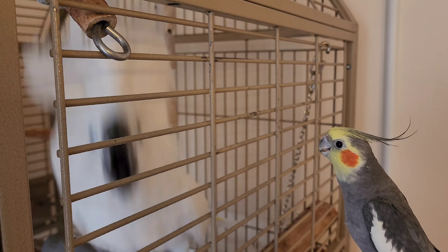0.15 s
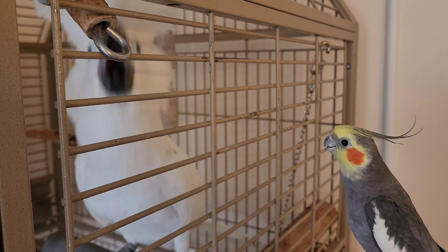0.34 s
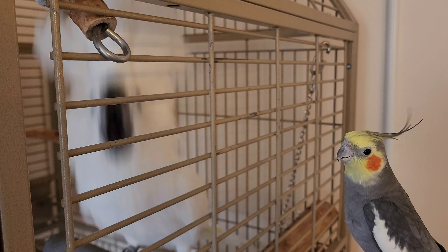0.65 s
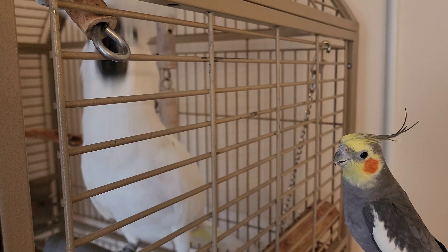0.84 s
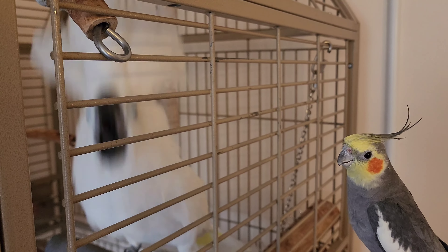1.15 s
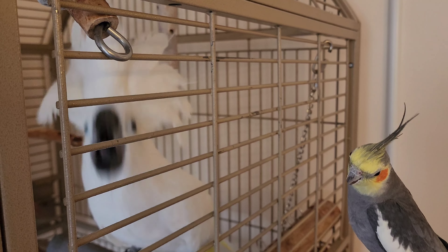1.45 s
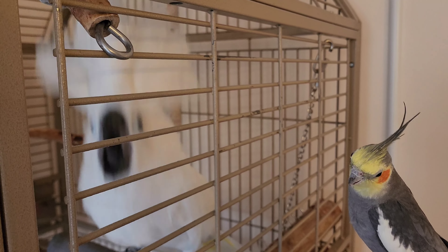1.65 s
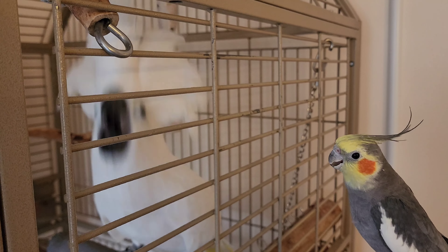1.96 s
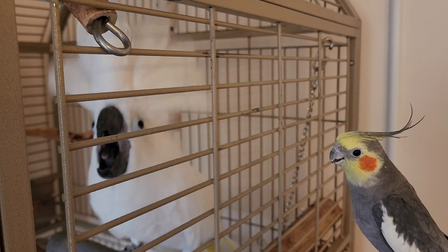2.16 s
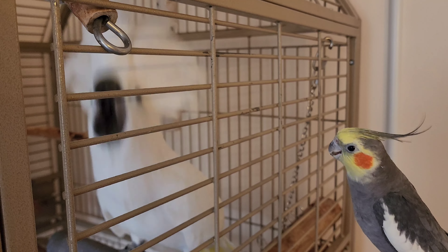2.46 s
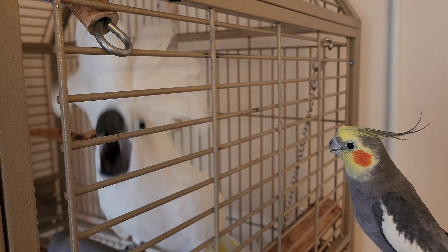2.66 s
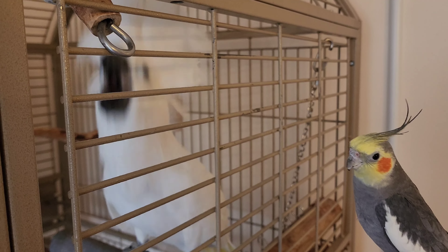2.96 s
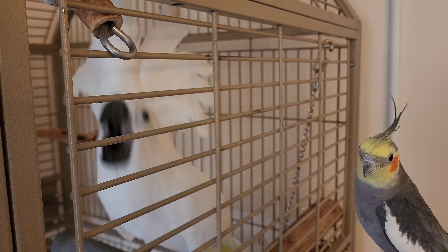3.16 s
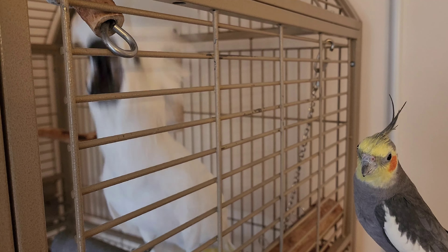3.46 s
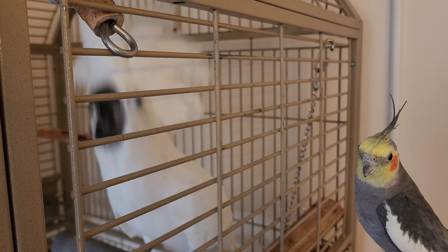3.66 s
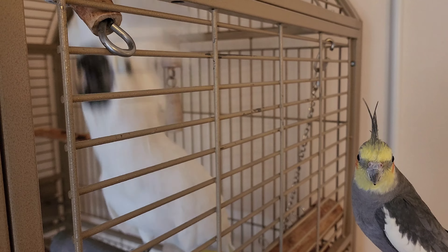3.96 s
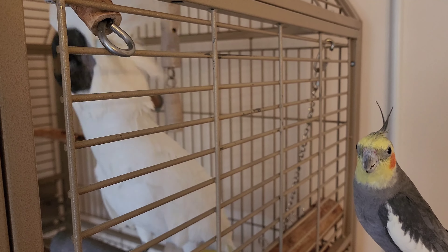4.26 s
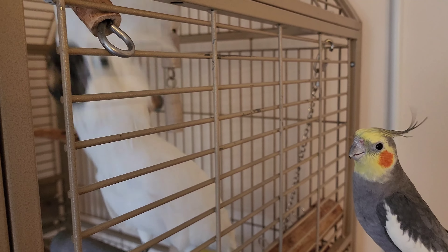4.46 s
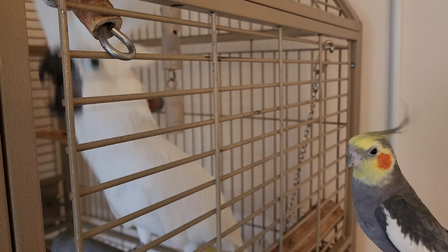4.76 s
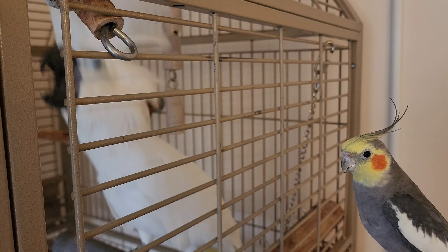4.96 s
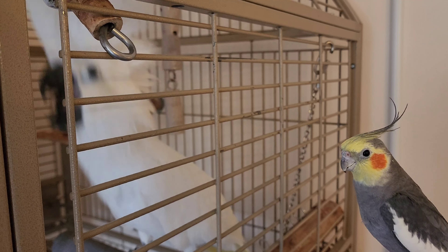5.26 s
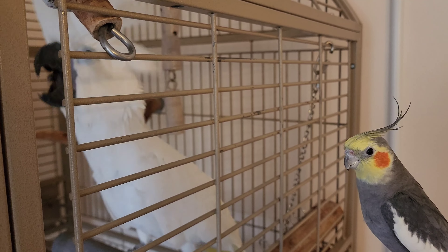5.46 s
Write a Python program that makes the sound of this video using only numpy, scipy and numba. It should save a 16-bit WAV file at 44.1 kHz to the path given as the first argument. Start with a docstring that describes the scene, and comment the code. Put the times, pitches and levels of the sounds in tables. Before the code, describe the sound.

A cockatoo in a cage calls briefly: a wheeze and rising whistle ending in a rasp at the start, then a broken call of thin whistles and two rasps near two seconds, and a final wheeze, whistle and stuttering squawk after four. Claws and beak tick on ringing bars; feathers rustle faintly. Quiet small room, low hum, close stereo microphone, bird slightly right.

```python
"""In a quiet room a caged cockatoo calls softly, a little to the right of a two-port microphone.
Each call opens with a wheeze (windpipe turbulence) or a clear whistle (gliding partials) and breaks
into a rasp (uneven pulses and puffs of air through windpipe, mouth and beak).
Claws and beak tick on the ringing cage bars, the perch thumps softly and feathers rustle;
coloured noise with wavering hum bands and a faint hiss fills the room."""
import sys
import numpy as np
from scipy import signal
from scipy.fft import rfft, irfft, next_fast_len
from scipy.io import wavfile
from scipy.ndimage import uniform_filter1d
from numba import njit

SR = 44100
rng = np.random.default_rng(int(sys.argv[2]) if len(sys.argv) > 2 else 0)


def digitize_waveform(pressure):
    """Quantize a signal to 16-bit integers and store it at the path in sys.argv[1].

    Rows of a 2-D input are taken as channels; values are limited to [-1, 1].
    """
    field = np.atleast_2d(pressure).T
    bounded = np.clip(field, -1, 1)
    quanta = np.round(bounded * 32767).astype(np.int16)
    wavfile.write(sys.argv[1], SR, quanta)


def volts(x):
    """Linear amplitude factor 10**(x/20) for a level x in dB, scalar or array-like."""
    e = np.asarray(x, float) / 20
    return 10 ** e


N = 247401
TIME = np.arange(N) / SR
SIDES = np.array([[1], [-1]])   # left, right

# one list a rasp, of the pulsed voice shaped by the mouth:
# start_s, mouth_level_db, mouth_resonance_hz, upper_resonance_db (against the mouth)
RASP_PATHS = [
    [(0.19, -45.5, 2236, -7), (0.202, -27, 2303, -8), (0.248, -25.5, 3173, -4), (0.273, -18.5, 3198, -4.5),
     (0.317, -27.5, 3532, -3), (0.335, -41.5, 3104, 6)],
    [(1.962, -46, 3010, -9), (1.984, -24, 2980, -9), (1.99, -18, 3047, -29), (2.02, -29.5, 3020, -8.5),
     (2.03, -18, 3133, -27), (2.04, -26.5, 3156, -16.5), (2.085, -25, 3290, -16.5),
     (2.095, -23, 3305, -29.5), (2.122, -18.5, 3286, -17), (2.13, -14.5, 3176, -14),
     (2.15, -15.5, 3190, -30), (2.16, -28.5, 3054, -31.5)],
    [(2.478, -39.5, 2890, -9), (2.49, -26, 2873, -10), (2.508, -19, 2831, -9.5), (2.524, -19, 3200, -5.5),
     (2.56, -42, 3098, -0.5)],
    [(4.358, -32, 2740, -14.5), (4.364, -23.5, 2647, -10), (4.403, -23, 2746, -4.5),
     (4.408, -20.5, 3117, -5), (4.435, -15, 3313, -7), (4.459, -28.5, 3130, 7.5), (4.49, -30, 3450, 1)],
]
# resonances that air noise excites in the beak: centre_hz, width_hz, level_db
BEAK_MODES = [(5840, 890, -5), (7000, 760, 0)]


def rms_one(x):
    """Scale to rms 1."""
    return x / np.sqrt(np.mean(x ** 2) + 1e-20)


def noise():
    """White noise as long as the scene."""
    return rng.standard_normal(N)


def at_hz(points, hz):
    """Read a spectrum on a log-frequency axis."""
    point_hz, value = np.array(points).T
    return np.interp(np.log(hz + 1), np.log(point_hz), value)


def in_time(rows):
    """Columns of a table, one value a sample; corners are rounded over 3 ms."""
    s, *columns = np.transpose(rows)
    return [uniform_filter1d(np.interp(TIME, s, c), size=130) for c in columns]


def sounding(tables, edge_s):
    """1 inside any of the tables, 0 outside, with soft edges."""
    inside = sum((TIME >= rows[0][0]) & (TIME <= rows[-1][0]) for rows in tables) > 0
    return uniform_filter1d(inside * 1., max(int(edge_s * SR), 1))


def since_start(tables):
    """Which table began last, and how many seconds ago."""
    starts = np.array([rows[0][0] for rows in tables])
    which = np.maximum(np.searchsorted(starts, TIME) - 1, 0)
    return which, np.maximum(TIME - starts[which], 0)


def drift(rate_hz):
    """Random wander of rms 1: noise through two one-pole lowpasses at rate_hz."""
    r = np.exp(-2 * np.pi * rate_hz / SR)
    wander = signal.lfilter([1], [1, -2 * r, r * r], rng.standard_normal(N + SR))
    return rms_one(wander[SR:])


def cut(x, hz, kind):
    """A steep filter edge."""
    return signal.sosfilt(signal.butter(6, hz, kind, fs=SR, output="sos"), x)


def resonate(x, modes):
    """Parallel resonances of (centre_hz, width_hz, level_db), signs alternating."""
    out = 0
    for k, (hz, width_hz, db) in enumerate(modes):
        r = np.exp(-np.pi * width_hz / SR)
        a = [1, -2 * r * np.cos(2 * np.pi * hz / SR), r * r]
        b = [(1 - r * r) / 2, 0, (r * r - 1) / 2]
        out = out + (-1) ** k * volts(db) * signal.lfilter(b, a, x + 1e-18)
    return out


@njit
def glide(x, cosine, r):
    """A two-pole resonance whose centre moves."""
    y = np.zeros(len(x))
    for i in range(2, len(x)):
        y[i] = x[i] - x[i - 2] + 2 * r * cosine[i] * y[i - 1] - r * r * y[i - 2]
    return y


def moving_resonance(x, centre_hz, width_hz):
    """A resonance that follows a centre curve at a constant width."""
    return glide(x, np.cos(2 * np.pi * centre_hz / SR), np.exp(-np.pi * width_hz / SR))


def evened(x, span_s):
    """Divide by the running rms, so that a level curve can be laid on."""
    return x / np.sqrt(uniform_filter1d(x ** 2, int(span_s * SR)) + 1e-20)


def hum():
    """A few narrow noise bands waver like hum."""
    # hum bands: centre_hz, width_hz, level_db
    bands = [(50, 19, -68.5), (142.1, 20, -63.5), (220.1, 18, -63.5), (299, 27, -71.5), (437, 65, -69)]
    total = 0
    for hz, width_hz, db in bands:
        once = resonate(noise(), [(hz, width_hz, 0)])
        total = total + volts(db) * rms_one(resonate(once, [(hz, width_hz, 0)]))
    left_over_right_db = 3.5
    return total * volts(left_over_right_db / 2 * SIDES)


def room_tone():
    """Coloured noise, largely shared by both sides except in the treble, and the hum."""
    # colour of the noise: pitch_hz, density_db (relative)
    colour = [(12, -38), (20, -2), (93, -9.5), (232, -0.5), (333, -7.5), (440, -4.5), (598, -13),
              (790, -12), (1630, -21), (1980, -18), (3360, -29.5), (7340, -32), (9970, -39), (13200, -30.5),
              (15600, -42.5)]
    # how alike left and right are: pitch_hz, likeness (1 = the same, 0 = unrelated)
    likeness = [(60, 1), (180, 0.94), (550, 0.59), (1650, 0.82), (4970, -0.08), (15000, -0.02)]
    # side balance of the noise: pitch_hz, left_over_right_db
    balance = [(60, -2), (180, 1.5), (550, 3), (1650, -3), (4970, -3.5), (15000, -2.5)]
    # level of the noise above 3 kHz: time_s, level_db
    treble_level = [(0, -59), (1.2, -64.5), (2, -63.5), (3.8, -68.5), (5.61, -67)]
    rumble_db = -56   # below 3 kHz
    left_lead_s = .00018   # the coloured noise reaches the left port first

    hz = np.fft.rfftfreq(N, 1 / SR)
    alike = np.clip(at_hz(likeness, hz), 0, 1)
    spectra = rfft(rng.standard_normal((2, N)))
    mid, side = spectra * volts(at_hz(colour, np.minimum(hz, 14200)))
    pair = np.sqrt(1 + alike) * mid + np.sqrt(1 - alike) * side * SIDES
    pair = pair * volts(at_hz(balance, hz) / 2 * SIDES)
    pair = pair * np.exp(1j * np.pi * hz * left_lead_s * SIDES)
    low, high = irfft(pair * (hz < 3000), N), irfft(pair * (hz >= 3000), N)
    hiss_db, = in_time(treble_level)
    hiss = volts(hiss_db + drift(5)) * rms_one(high)
    return volts(rumble_db) * rms_one(low) + hum() + hiss


def rustle():
    """Feathers shift: resonant noise in faint bright swells, several a second."""
    # middle of the swells: time_s, level_db
    rustle_level = [(0, -65.5), (1.6, -71), (2.8, -70.5), (3.4, -75.5), (5.61, -84)]
    spread_db, wander_hz = 5, 6
    db, = in_time(rustle_level)
    swell = volts(db + spread_db * drift(wander_hz))
    modes = [(1973, 1400, 3), (4300, 2000, -3.5), (6800, 490, 2.0), (12520, 2600, -11.5)]
    return swell * rms_one(resonate(rng.standard_normal((2, N)), modes))


def thumps():
    """The perch takes a step: soft low blows, each a sine that swells and dies within tens of ms."""
    # steps: start_s, push_db (before the envelope)
    steps = [(0.88, -34.5), (1.542, -41.5)]
    thump_hz = 72.4
    out = np.zeros(N)
    for s, db in steps:
        age = np.maximum(TIME - s, 0)
        envelope = age / 0.011 * np.exp(-age / 0.0085)
        out += volts(db) * envelope * np.sin(2 * np.pi * thump_hz * age)
    return out


def ticks():
    """Each touch of claw or beak is a short bright noise scuff whose knock sets the bars ringing."""
    # touches on the bars: start_s, scuff_db, knock_db (against the scuff)
    touches = [(0.0458, -40, -8.5), (0.5635, -51, 6), (0.6894, -62, 12.5), (0.7842, -58, 13.5),
               (0.9248, -50, 9.5), (1.0218, -60.5, 17), (1.1096, -55.5, 12.5), (1.2796, -63.5, 17.5),
               (1.5333, -54.5, 6), (1.7532, -57.5, 16), (1.795, -51.5, 2), (2.7453, -60.5, 18),
               (2.9189, -68, 11.5), (3.1348, -62.5, 3), (3.1961, -55, 18.5), (3.2021, -48.5, -7),
               (3.2148, -48.5, 11.5), (3.445, -63.5, 15), (3.5054, -61, 13.5), (3.8086, -69.5, 22.5),
               (4.62, -65.5, 5), (4.864, -58, -1), (5.2021, -59, -7)]
    # what the bars ring with: pitch_hz, level_db, t60_s
    bars = [(1243.5, 14, 0.13), (2397, -4.5, 0.14), (2710, -1, .1), (4650, 5.5, 0.18), (4530, -1, .2),
            (5010, -16, .12), (5670, 1, 0.15), (6330, 5.5, 0.099), (8230, -3.5, 0.25), (11370, -2.4, 0.092)]
    rise_s, fall_s = 0.0027, 0.016
    scuff, knock = np.zeros(N), np.zeros(N)
    for s, db, knock_db in touches:
        age = np.maximum(TIME - s, 0)
        shape = volts(db) * np.minimum(age / rise_s, 1) * np.exp(-age / fall_s)
        scuff += shape
        knock += volts(knock_db) * shape
    bright = [(4310, 1000, 1), (6620, 850, -1), (12310, 3200, -1)]
    scuff = scuff * rms_one(resonate(noise(), bright))
    # a mode that decays 60 dB in t60 has this width
    bar_modes = [(hz, np.log(1000) / np.pi / t60, db) for hz, db, t60 in bars]
    ring = resonate(noise() * knock, bar_modes)
    dull_knock = resonate(noise() * knock, [(2062, 1300, -3)])
    return scuff + ring + dull_knock


def room(x):
    """Eight feedback delays a side, duller on every round, then three near-allpass diffusers."""
    t60_s, wall_cut_hz = 0.31, 7500   # t60 of the bass
    size = next_fast_len(N + SR)
    turn = -2j * np.pi * np.fft.rfftfreq(size)   # exponent of a one-sample delay
    dull = np.exp(-2 * np.pi * wall_cut_hz / SR)
    wall = (1 - dull) / (1 - dull * np.exp(turn))
    response = np.zeros((2, len(turn)), complex)
    for k, lag in enumerate(rng.uniform(.008, 0.036, 16) * SR):
        loop = volts(-60 * lag / SR / t60_s) * wall * np.exp(turn * int(lag))
        response[k % 2] += (-1) ** (k // 2) * loop / (1 - loop)
    for lag in rng.uniform(.001, .006, 3) * SR:   # furniture scatters each echo
        delay = np.exp(turn * int(lag))
        response *= (delay - .6) / (1 - 0.49 * delay)
    return irfft(rfft(x, size) * response, size)[:, :N]


def to_ports(x):
    """Each microphone port hears the bird with its own level, phase and first echo."""
    # side balance of the bird: pitch_hz, left_over_right_db
    balance = [(60, 0.0), (110, 0.5), (200, 3), (380, -0.5), (700, 1.5), (1290, -5), (2380, -11.5),
               (4400, -2.5), (8120, 2), (15000, 0.5)]
    # phase between the ports: pitch_hz, left_lead_rad
    phase = [(400, -0.22), (1500, -0.42), (3200, 0.9), (5200, 0.8), (7000, -2.4), (9000, -1), (13000, -2.7),
             (15000, -1)]
    # first echo, left port then right: delay_s, level_db (approached towards the treble)
    near_wall = [(.0017, -15), (.0026, -1.5)]
    # a dip in what the ports pick up from that side
    shadow_hz, shadow_width_hz, shadow_share = 8600, 1200, 0.49

    hz = np.fft.rfftfreq(N, 1 / SR)
    left = volts(at_hz(balance, hz) / 2) * np.exp(.5j * at_hz(phase, hz))
    scale = 2 / np.abs(left + 1 / left)   # the sum of both direct paths keeps its level
    scale = scale * (1 - shadow_share * np.exp(-((hz - shadow_hz) / shadow_width_hz) ** 2))
    brighter = hz / (hz + 4000)
    echo = [volts(db) * brighter * np.exp(-2j * np.pi * hz * s) for s, db in near_wall]
    return irfft(rfft(x) * scale * (np.array([left, 1 / left]) + echo), N)


def wheezes():
    """Air drawn in before a call: fluttering windpipe turbulence with a thin hiss past the beak."""
    # one list a wheeze: start_s, windpipe_level_db, hiss_db (against it), narrow_resonance_hz
    breaths = [
        [(0.0, -42.5, -24.5, 1700), (0.034, -41.5, -27, 1920), (0.05, -35.5, -14.5, 2000),
         (0.082, -40.5, -8.5, 1770), (0.12, -44.5, -10, 1820)],
        [(4.12, -56.5, -12, 1500), (4.186, -44, -17, 1600), (4.242, -36.5, -28, 1540), (4.282, -46, -32, 1500),
         (4.31, -46.5, -35.5, 1500)],
    ]
    # fixed resonances of the windpipe: centre_hz, width_hz, level_db
    tube_modes = [(907.5, 1500, -18.5), (1635, 180, 12), (2600, 610, -15.5), (3460, 1200, -18)]
    narrow_width_hz, narrow_db = 380, -4.5
    db, hiss_db, narrow_hz = in_time(np.concatenate(breaths))
    air = noise() * volts(2.4 * drift(200))   # a loose flutter chops the air
    tube = rms_one(cut(resonate(air, tube_modes), [600, 4700], "band"))
    narrow = rms_one(moving_resonance(air, narrow_hz, narrow_width_hz))
    tube = rms_one(tube + volts(narrow_db) * narrow)
    hiss = rms_one(cut(resonate(air, BEAK_MODES + [(12600, 3000, 0)]), 5100, "high"))
    return volts(db) * (tube + volts(hiss_db) * hiss) * sounding(breaths, 0.037)


def rasp_colour(db):
    """Windpipe, beak and top hiss against the mouth: own to each rasp, falling back as it swells."""
    # one row a rasp, at the usual level: windpipe_db, beak_db, top_hiss_db
    colours = [(-1.5, -21.5, -18), (-12.5, -29.5, -28.5), (-9.5, -24.5, -20.5), (-4.5, -20, -17)]
    # dB gained per dB of swell: windpipe, beak, top hiss
    swell_shares = np.array((.4, .7, .65))
    usual_db = -25
    pipe_fade_db_per_s = 62.5   # the windpipe closes off as a rasp goes on
    which, age = since_start(RASP_PATHS)
    own = np.array(colours)[which].T
    pipe, beak, top = own + (swell_shares[:, None] - 1) * (db - usual_db)
    return pipe - pipe_fade_db_per_s * age, beak, top


def rasp_flow(db):
    """Level curve of the rasps, dipping briefly where the air stream catches."""
    # catches: start_s, length_s, depth_db (before smoothing)
    catches = [(.267, .006, -20), (4.379, .004, -12), (4.393, .005, -12), (4.4025, .0045, -14),
               (4.4135, .0045, -12), (4.4245, .0035, -18), (4.434, .004, -7), (4.468, .011, -9)]
    dip_db = sum(depth * ((TIME > s) & (TIME < s + length)) for s, length, depth in catches)
    return volts(db + uniform_filter1d(dip_db, size=40)) * sounding(RASP_PATHS, 0.0027)


def rasps():
    """The syrinx beats in uneven pulses, a puff of air each, through windpipe, mouth and beak."""
    # how the syrinx beats: time_s, pulses_per_s (before wander), irregularity (0-1)
    beats = [(.19, 700, .5), (.26, 430, .4), (.29, 380, .35), (.305, 215, .22), (.335, 170, .15),
             (1.962, 400, .15), (1.98, 380, .15), (2.0, 330, .3), (2.12, 300, .3), (2.158, 500, .5),
             (2.478, 880, .15), (2.495, 920, .06), (2.53, 1020, .09), (2.545, 700, .5), (2.56, 300, .5),
             (4.358, 700, .4), (4.43, 1060, .2), (4.442, 1050, .08), (4.455, 970, .08), (4.467, 860, .12),
             (4.48, 400, .3)]
    # windpipe resonances: centre_hz, width_hz, level_db
    windpipe = [(1076, 360, 1.5), (1300, 220, 5.5), (2310, 509, 10.5)]
    # resonances of the top hiss: centre_hz, width_hz, level_db
    top_modes = [(11287, 2500, -15.5), (14900, 1100, -3)]
    mouth_width_hz, upper_hz, upper_width_hz = 420, 3950, 850
    top_over_mouth, top_width_hz = 4.55, 1500   # a high resonance moves with the mouth

    db, mouth_hz, upper_db = in_time(np.concatenate(RASP_PATHS))
    pipe_db, beak_db, top_db = rasp_colour(db)
    per_s, uneven = in_time(beats)
    cycles = np.cumsum(per_s * volts(6 * uneven * drift(150))) / SR
    pulses = np.diff(np.floor(cycles), prepend=0) * volts(1.4 * uneven * drift(400))
    puff = signal.lfilter([1], [1, -np.exp(-1 / (0.0036 * SR))], pulses) * noise()   # dies in 3.6 ms

    source = cut(pulses + 0.16 * uneven * puff, 3400, "low")
    mouth = moving_resonance(source, mouth_hz, mouth_width_hz)
    mouth = moving_resonance(mouth, mouth_hz, 1600)
    upper = resonate(source, [(upper_hz, upper_width_hz, 0)])
    upper = resonate(upper, [(upper_hz, 1500, 0)])
    pipe = resonate(resonate(source, windpipe), [(1500, 1000, 0)])

    air = 0.28 * pulses + puff
    beak = cut(resonate(air, BEAK_MODES), [5000, 7900], "band")
    top_hz = np.minimum(top_over_mouth * mouth_hz, 15000)
    moving = moving_resonance(air, top_hz, top_width_hz)
    top = cut(volts(-11.0) * moving + resonate(air, top_modes), 10000, "high")

    parts = [(mouth, 0), (upper, upper_db), (pipe, pipe_db), (beak, beak_db), (top, top_db)]
    return rasp_flow(db) * sum(volts(part_db) * evened(part, 0.019) for part, part_db in parts)


def whistles():
    """Clean partials; strong and weak cycles alternate, which adds half lines; breath hazes them."""
    # one list a note: start_s, pitch_hz (before jitter), fundamental_db,
    # mouth_opening_db (partial 2 against the fundamental),
    # alternation_db (line at 1.5 times the pitch against the fundamental)
    notes = [
        [(0.095, 1299, -41.5, -25.5, -1), (0.11, 1278, -38.5, -15.5, -2), (0.124, 1387, -28, -22, -6.5),
         (0.136, 1722, -24, -15.5, -21.5), (0.15, 1815, -20.5, -13, -47), (0.165, 1890, -20.5, -11, -41.5),
         (0.175, 2039, -13.5, -27.5, -49), (0.19, 1967, -20.5, -13, -22.5), (0.205, 1445, -27, -8, -2)],
        [(1.662, 1652, -41.5, -13, -19.5), (1.669, 1412, -40, -12, -17.5), (1.68, 1280, -40.5, -14, 5),
         (1.7, 1335, -41, -19.5, -0.5), (1.74, 1334, -32.5, -31.5, -7.5), (1.762, 1476, -36, -40.5, -12),
         (1.8, 1387, -32.5, -39, -14), (1.818, 1452, -33, -41.5, -13.5), (1.852, 1364, -31.5, -39, -18),
         (1.862, 1262, -39, -21.5, -12.5), (1.9, 1350, -27, -34.5, -48), (1.938, 1514, -31.5, -13, -21.5),
         (1.955, 962, -40.5, -8, 2.5), (1.968, 1407, -41.5, -3.5, 0.5)],
        [(2.263, 1638, -39, 1.5, -19.5), (2.268, 1412, -39.5, 15.5, -17.5), (2.28, 1340, -39, 17, -22),
         (2.295, 1335, -36.5, 9.5, -1), (2.306, 1318, -41.5, 8.5, -2), (2.314, 1345, -37.5, 18.5, -9),
         (2.335, 1370, -35.5, 13.5, -35), (2.352, 1417, -36.5, 5, -14), (2.37, 1380, -32.5, -16, -19),
         (2.39, 1463, -41.5, -38, -3), (2.43, 1381, -31.5, -27, -25.5), (2.45, 1385, -36.5, -35.5, -13),
         (2.464, 1213, -37.5, -9, -15.5), (2.478, 1334, -52.5, -17, 21)],
        [(4.292, 1352, -38.5, -43.5, -5), (4.303, 1261, -46.5, -13, 5.5), (4.315, 1312, -32, -17.5, -11),
         (4.33, 1434, -31, -9, -14), (4.348, 1464, -29, -6.5, -44.5), (4.358, 1543, -27.5, -2, -38),
         (4.367, 1404, -28, -8.5, -15), (4.375, 1416, -33, 1, -8.5)],
    ]
    # each pair: level_db at an opening of 0 dB, gain_db_per_db of opening;
    # partials 3 and 4 against the fundamental, lines 0.5 and 2.5 against line 1.5
    third_rule, fourth_rule = (-16, .3), (-31, 0.77)
    half_rule, five_halves_rule = (-27, -.6), (-1.5, 0.66)
    # higher partials: multiple of the pitch, level_db (against partial 4)
    overtones = [(5, -3), (6, -10), (8, -9), (9, -5), (10, -4), (11, -8)]
    bloom_s, bloom_db = 0.0091, 25.5   # partials 3 and up come in after a note has begun
    # partial 3 is strongest at this resonance and sinks by up to the loss away from it
    third_best_hz, third_width_hz, third_loss_db = 3930, 350, 18.5

    hz, first, opening, alternation = in_time(np.concatenate(notes))
    second, three_halves = first + opening, first + alternation

    def follow(base_db, rule):
        db, per_db = rule
        return base_db + db + per_db * opening

    early_db = -bloom_db * np.exp(-since_start(notes)[1] / bloom_s)
    third = follow(first, third_rule) + early_db
    fourth = follow(first, fourth_rule) + early_db
    third = third - third_loss_db * (1 - np.exp(-((3 * hz - third_best_hz) / third_width_hz) ** 2))
    half = follow(three_halves, half_rule)
    five_halves = follow(three_halves, five_halves_rule)

    phase = 2 * np.pi * np.cumsum(hz * (1 + 0.0044 * drift(60))) / SR
    lines = [(1, first), (2, second), (3, third), (4, fourth)]
    lines += [(.5, half), (1.5, three_halves), (2.5, five_halves)]
    lines += [(k, fourth + db) for k, db in overtones]
    tone = 0
    for k, db in lines:
        level = volts(db + .45 * k ** 1.3 * drift(110))   # higher lines waver more
        tone = tone + level * np.sin(k * phase) * (k * hz < 15500)

    haze_modes = [(2200, 6100, -5.0), (6470, 3300, -6.5), (13500, 3600, -3.5)]
    haze = volts(first - 34.5) * rms_one(resonate(noise(), haze_modes))
    hoarse_modes = [(1880, 460, 8.0), (3400, 2000, -23.0)]
    hoarse = volts(three_halves - 9.0) * rms_one(resonate(noise(), hoarse_modes))   # uneven cycles
    sheen = volts(fourth + 7) * rms_one(cut(noise(), [10500, 15300], "band"))
    return (np.sqrt(2) * tone + haze + hoarse + sheen) * sounding(notes, 0.0026)


def scene():
    """Bird and cage, direct and in the room, over the room tone."""
    background = room_tone() + rustle() + thumps()
    cage = ticks()
    bird = wheezes() + rasps() + whistles()
    direct = to_ports(bird) + cage * volts([[-1], [1.2]])   # the cage leans right
    return background + direct + volts(-20.5) * room(bird + cage)


def low_pass(x):
    """Removes everything above the highest recorded frequency."""
    return signal.sosfilt(signal.butter(12, 15720, fs=SR, output="sos"), x)


def record(dry):
    """Turn the finished mix into the stereo sound that is written."""
    return low_pass(dry)


dry = scene()
out = record(dry)
digitize_waveform(out)
```